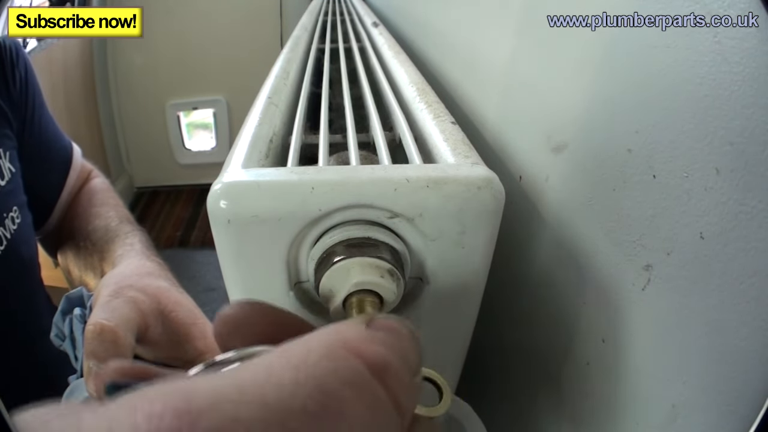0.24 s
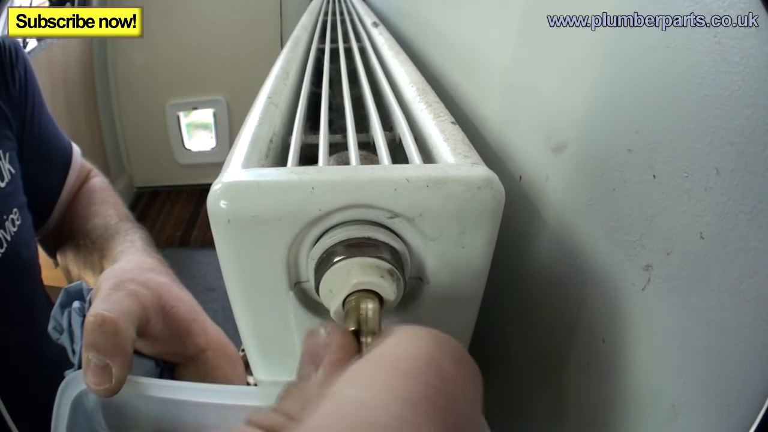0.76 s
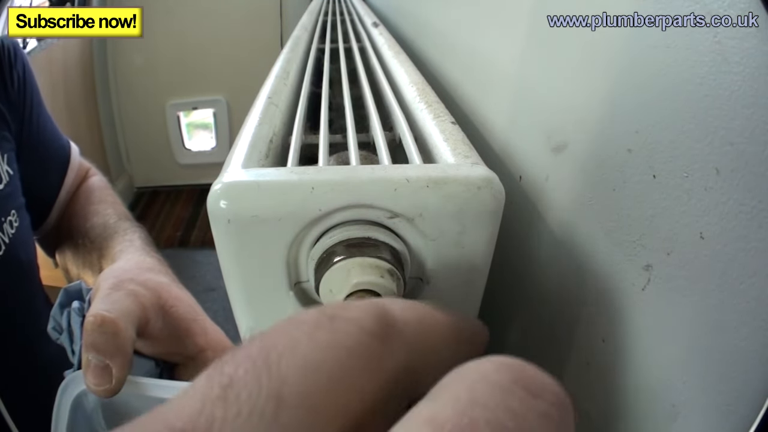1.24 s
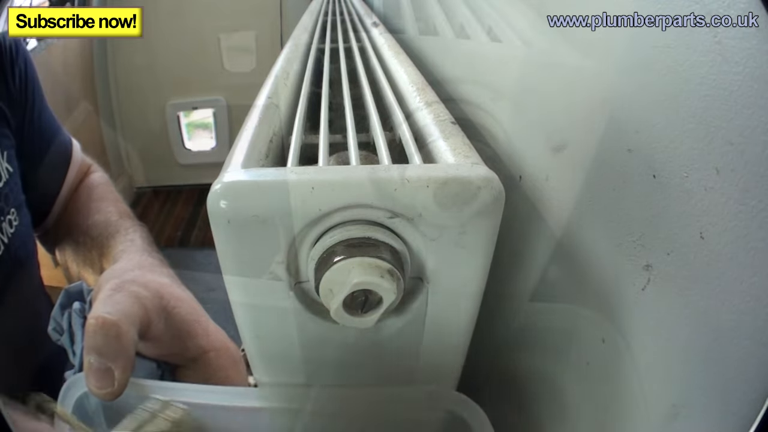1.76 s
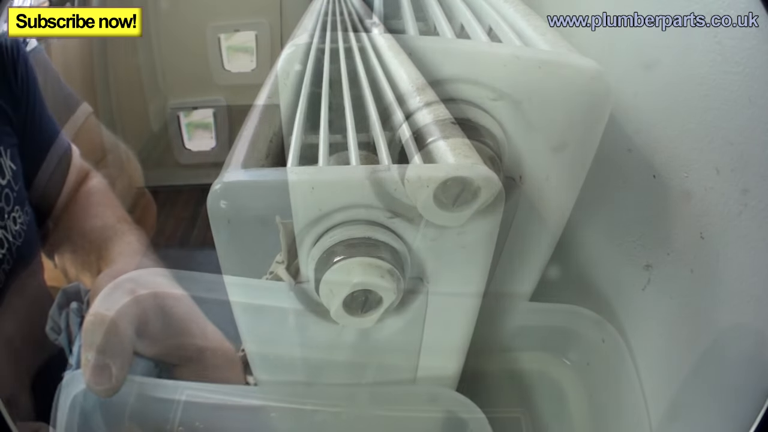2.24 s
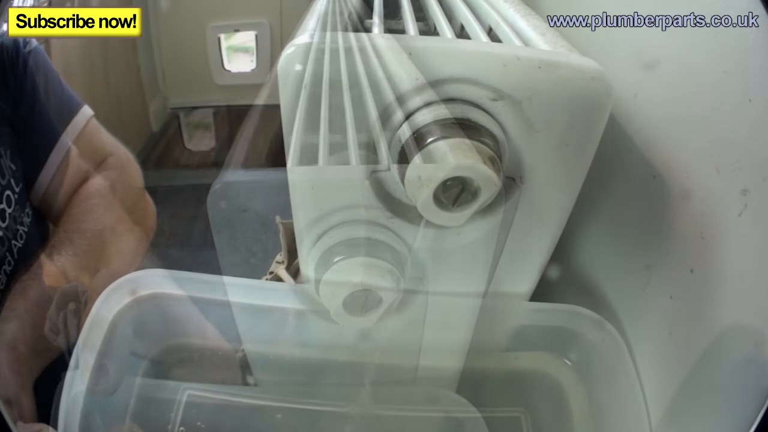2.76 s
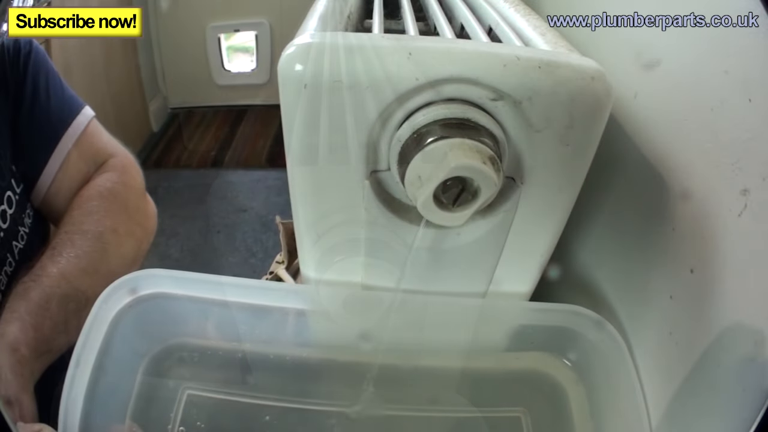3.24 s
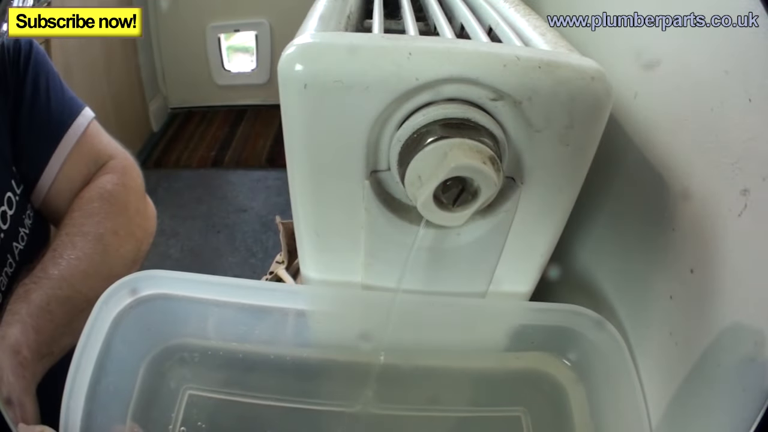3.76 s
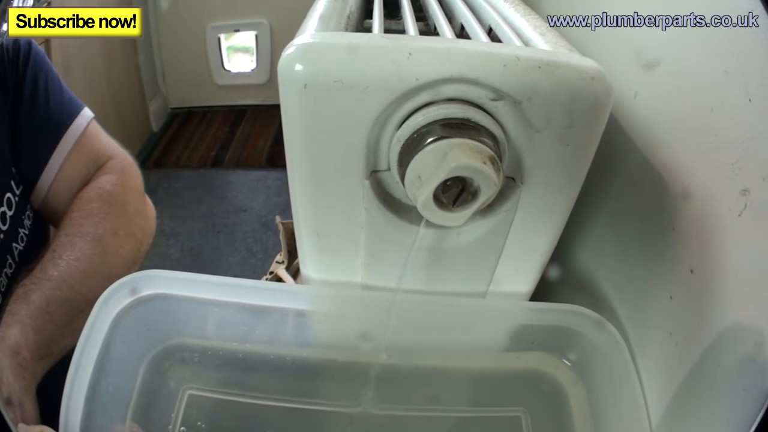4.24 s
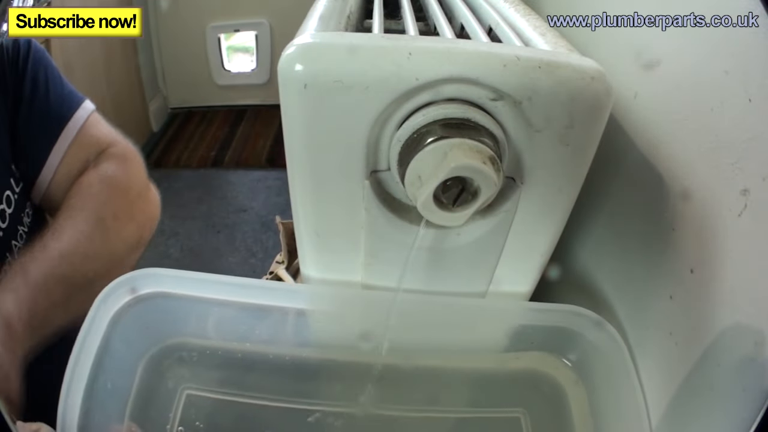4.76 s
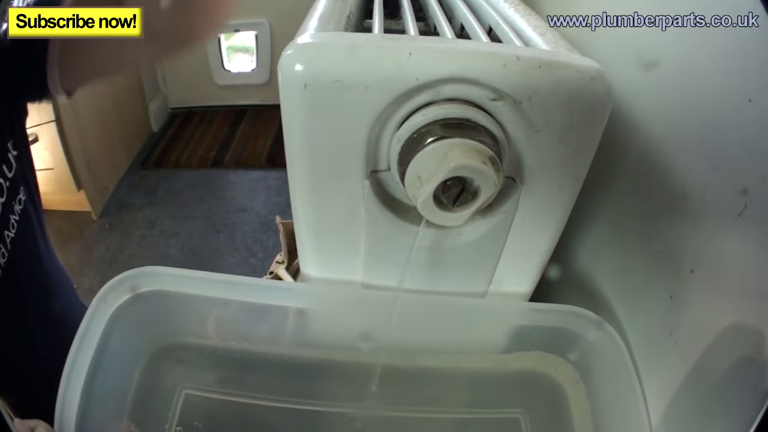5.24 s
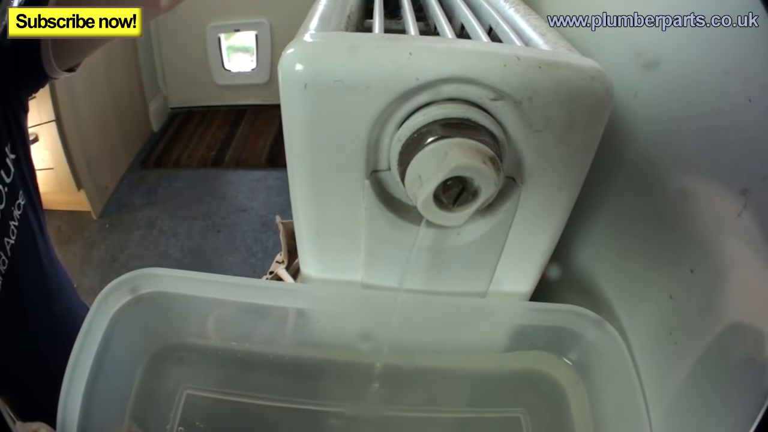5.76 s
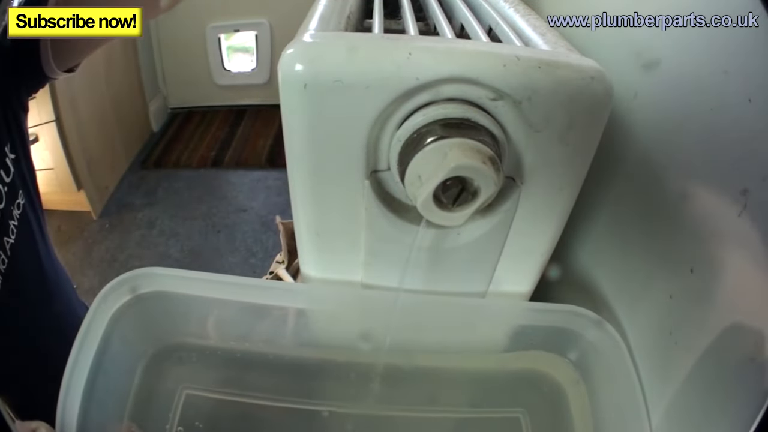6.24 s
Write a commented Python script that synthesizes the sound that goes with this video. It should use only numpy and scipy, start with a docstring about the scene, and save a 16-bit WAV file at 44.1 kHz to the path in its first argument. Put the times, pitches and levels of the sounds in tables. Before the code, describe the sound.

Brass key clicks over a hissing, sputtering jet beating on plastic, then a slow crossfade to a delicate trickle plinking into standing water.

```python
"""Hiss and drumming come first: air and spray rush from an open radiator bleed valve in a small room,
and a thin jet beats on a plastic tub, all close to a microphone with two ports. The brass key clicks on
the valve and a hand brushes past as it is drawn off. The jet scene crossfades into a later one, where a
thin stream runs into standing water and trapped bubbles plink. Noise and resonances make jet and air;
decaying sines make key and bubbles."""
import sys
import numpy as np
from scipy import signal
from scipy.fft import rfft, irfft
from scipy.io import wavfile

SR = 44100
rng = np.random.default_rng(int(sys.argv[2]) if len(sys.argv) > 2 else 0)


def unload_audio(sound):
    """Save the sound as a 16-bit wav file, at the path given as the first command line argument."""
    columns = np.transpose(np.atleast_2d(sound))
    # keep every value between -1 and 1, then stretch to whole-number steps
    steps = np.round(np.clip(columns, -1, 1) * 32767)
    wavfile.write(sys.argv[1], SR, steps.astype(np.int16))


N = 287091
TIME = np.arange(N) / SR

# jet on the tub, uneven while the key is in its way, before the fade: time_s, level_db
JET_LEVEL = [(0, -29.5), (.08, -36.5), (.13, -31.5), (.44, -35.5), (.56, -32), (.66, -30.5), (.72, -40),
             (.78, -30), (.95, -32.5), (1.5, -31.5)]
# main tub resonance, sinking as water loads the plastic: time_s, pitch_hz
TUB_MAIN_PITCH = [(0, 830), (.3, 807), (.62, 772), (1.2, 762), (2, 750)]
# other tub resonances, level relative to the main one: pitch_hz, width_hz, level_db
TUB_RESONANCES = [(216, 26, -18), (281.6, 45.3, -5.5), (367.4, 63, -10.5), (433, 218, -9), (604, 112, -15),
                  (868, 45, -6.5), (1046, 98, -9), (1319, 51, -7), (1398, 281, -8.5), (1642, 520, -19.5),
                  (2158, 390, -21.5)]
# spectrum of the spray through a narrow gap: frequency_hz, density_db_per_hz
NARROW_SPECTRUM = [(200, -32), (1500, -37), (2300, -6.5), (3200, -11.5), (4300, -4), (5300, -1.5),
                   (6500, -3.5), (7700, -8.5), (8800, -12.5), (10500, -8.5), (12000, -25), (14000, -19),
                   (15500, -64)]
# spectrum of the spray with the valve wide open: frequency_hz, density_db_per_hz
OPEN_SPECTRUM = [(200, -44), (1800, 14), (2700, 5), (3400, -5), (4700, 7), (6350, -1.5), (7300, 4.5),
                 (8600, 7.5), (10400, -3), (12500, -4), (13600, -2.5), (15500, -24)]
# level added to the hiss, choked unevenly by the key: time_s, level_db
AIR_LEVEL = [(0, 3.5), (.3, 1.5), (.45, 0), (.56, 4), (.73, 3.5), (.85, 4), (1.2, 2), (1.5, 3), (2.3, 5),
             (2.72, 4), (2.8, 2), (3.4, 2)]
# narrow resonances of the tub wall rung by spray: pitch_hz, level_db
WALL_RESONANCES = [(3130, 8), (3785, 9), (5280, 1), (6840, 2.5), (9700, -8), (10900, -4)]
# key knocks on the valve, with the share rattling on in the radiator: start_s, level_db, share_0_to_1
KEY_KNOCKS = [(0.0336, -27.5, 0.74), (0.098, -32.5, 0.8), (0.1294, -12.5, 0.27), (0.142, -12, 0.4),
              (0.1455, -26, 0.24), (0.173, -24, 0.93), (0.2703, -12.5, 0.54), (0.285, -22, 0.9),
              (0.3182, -24.5, 0.7), (0.6636, -26, 0.2)]
# ringing of key and valve: pitch_hz, level_db, t60_s
KEY_RESONANCES = [(2160, 1, 0.028), (2970, -6, 0.045), (4580, -4, 0.044), (5200, -4, 0.03),
                  (5700, 4, 0.059), (7000, 10, 0.02), (8960, 18.5, 0.0044), (10800, 9, 0.0044)]
# spectrum of the rattling radiator panels: frequency_hz, density_db_per_hz
RATTLE_SPECTRUM = [(300, -1), (800, 6.5), (2000, 2), (3300, 4.5), (5600, 6.5), (7500, 4.5), (10000, -8),
                   (15000, -32)]
# clear bubbles trapped by falling water: start_s, pitch_hz, level_db
CLEAR_BUBBLES = [(1.0545, 5040, -31), (1.2417, 10700, -21), (1.324, 12600, -15.5), (1.413, 6670, -27),
                 (1.4526, 8400, -25), (1.5863, 5360, -34), (1.7873, 4620, -29.5), (1.9066, 11200, -23.5),
                 (2.1281, 4620, -28), (2.1635, 10300, -6), (2.1844, 12200, -17), (2.2, 5160, -23),
                 (2.365, 7000, -23), (2.4227, 10360, -9.5), (2.456, 3370, -29.5), (2.468, 4372, -26),
                 (2.5485, 5300, -28), (2.56, 11800, -16.5), (2.5725, 10600, -18.5), (2.614, 3140, -29.5),
                 (2.632, 2820, -32), (2.68, 3500, -31.5), (2.705, 4060, -28), (2.723, 11500, -15),
                 (2.746, 6760, -24), (2.754, 8500, -10.5), (2.8156, 13700, -15), (2.8522, 7040, -24.5),
                 (2.8733, 3550, -25.5), (2.876, 4820, -25), (2.9608, 3300, -28.5), (2.974, 10960, -18),
                 (2.9844, 9400, -16), (3.0805, 10900, -14.5), (3.1114, 10900, -16.5), (3.1373, 7200, -24),
                 (3.138, 2740, -35.5), (3.171, 5480, -18.5), (3.202, 3330, -27.5), (3.2555, 10800, -15),
                 (3.2856, 5040, -35), (3.3373, 14500, -19.5), (3.339, 3340, -37.5), (3.365, 13500, -28),
                 (3.3882, 3520, -31), (3.4184, 8800, -36.5), (3.4603, 4700, -30.5), (3.5044, 2900, -34.5),
                 (3.547, 3110, -29.5), (3.7325, 4380, -35.5), (3.7935, 3810, -39.5), (3.795, 8060, -34),
                 (3.8275, 8500, -28.5), (3.829, 3780, -35), (3.9102, 4110, -20), (3.9167, 7100, -26.5),
                 (3.9479, 3140, -29.5), (4.0565, 4250, -44.5), (4.1, 5300, -31), (4.106, 3990, -26.5),
                 (4.31, 4580, -30.5), (4.4255, 3830, -25), (4.444, 3570, -33), (4.4751, 7500, -21.5),
                 (4.4755, 3580, -39), (4.4961, 5720, -32), (4.5678, 3470, -34.5), (4.59, 3350, -31),
                 (4.6223, 2960, -40), (4.63, 3100, -29), (4.663, 3230, -39), (4.7276, 7280, -31),
                 (4.7472, 6840, -19.5), (4.757, 6050, -31), (4.781, 3670, -24.5), (4.843, 3110, -42.5),
                 (4.895, 6070, -18.5), (4.895, 3300, -37.5), (4.95, 3500, -44), (4.997, 12230, -31.5),
                 (5.0433, 4200, -31.5), (5.0803, 4820, -31.5), (5.185, 4500, -36.5), (5.186, 3190, -44.5),
                 (5.217, 4560, -36.5), (5.2867, 5550, -18), (5.287, 4150, -32), (5.2877, 8100, -24),
                 (5.4695, 4290, -26), (5.612, 3440, -30), (5.6537, 4300, -46), (5.741, 3850, -25),
                 (5.76, 8150, -21.5), (5.792, 3770, -31), (5.868, 3660, -27.5), (5.9264, 3580, -40),
                 (5.9801, 4800, -28), (6.026, 7630, -27), (6.096, 3800, -24), (6.1506, 3800, -45.5),
                 (6.194, 3426, -34), (6.2178, 3170, -50), (6.356, 8080, -22.5), (6.4138, 5870, -24)]
# tick of a drop on the water in the tub: pitch_hz, level_db, t60_s
DROP_TICK = [(4580, -17, 0.019), (4900, 1, 0.01), (5650, -9, 0.0096), (7120, 5, 0.0089), (7980, 10, 0.0041),
             (8990, 3, 0.0077), (9550, 1.5, 0.0078), (12750, -2, 0.01)]
# echoes from tub walls and radiator: left_delay_s, right_delay_s, gain
EARLY_ECHOES = [(.00062, .00055, 0.14), (.0028, .0029, 0.17), (.0094, 0.011, 0.065)]
# soft bumps against the tub: start_s, level_db, pitch_hz
TUB_BUMPS = [(0.003, -34, 85), (0.032, -40, 101), (0.27, -39, 111), (0.316, -38, 90), (0.381, -37, 131),
             (0.514, -48, 70), (0.601, -50, 129), (0.633, -42, 160), (1.421, -43, 101), (1.456, -39, 115),
             (1.557, -47, 80), (1.808, -45, 160), (1.901, -35, 116)]
# spectrum of bump shudder and brush rumble: frequency_hz, density_db_per_hz
BUMP_SPECTRUM = [(20, -45), (50, -7), (110, 11), (170, 9), (300, 8.5), (900, -33)]
# the hand brushing past, silent outside these times: time_s, level_db
BRUSH_LEVEL = [(.46, -64), (.52, -41), (.57, -41), (.62, -42), (.68, -59), (.73, -77.5)]
# spectrum of the brushing hand: frequency_hz, density_db_per_hz
BRUSH_SPECTRUM = [(500, -1), (1800, 4), (4000, 7.5), (7000, 6), (10000, 0.5), (14000, -8), (16000, -19)]
# spectrum of the room tone: frequency_hz, density_db_per_hz
ROOM_TONE_SPECTRUM = [(25, -13), (45, -2.5), (90, 0.5), (130, 0.5), (205, 1.5), (270, -1), (550, -4),
                      (1100, -9.5), (2000, -14.5), (5000, -21), (10000, -19.5), (13500, -23.5),
                      (15000, -47)]
# reverberation time of the room: frequency_hz, t60_s
ROOM_DECAY = [(200, 0.77), (2000, 0.44), (3500, 0.28), (6000, 0.14), (15000, 0.15)]
# left-right likeness of diffuse sound: frequency_hz, likeness_0_to_1
STEREO_LIKENESS = [(60, 0.92), (150, 0.72), (300, 0), (1400, 0), (2800, 0.67), (6800, 0.68), (15000, 1)]
# bands where reflections between tub and radiator cancel: frequency_hz, width_hz, depth_0_to_1
CANCELLED_BANDS = [(1887, 90, 0.63), (5500, 110, 0.32), (6400, 330, 0.29), (10390, 200, 0.45),
                   (12750, 600, 0.4)]
# lead of the right microphone port, nearer to the jet: frequency_hz, lead_rad
RIGHT_PORT_LEAD = [(120, 0.1), (420, 0.4), (1400, 0.3), (1700, 1), (2000, 1.24), (3400, 0.58), (6000, 0.12)]

# the jet scene fades out between these times
FADE_START_S, FADE_END_S = 1.47, 3.62
# opening (0-1) holds at the narrow share until the key comes off, then nears 1 with a time constant
NARROW_SHARE, KEY_OFF_S, OPENING_S = 0.31, 1.05, 0.92
# the upper tub resonance keeps its pitch but gains strength over the drumming
TUB_UPPER_HZ, UPPER_START_DB, UPPER_DB_PER_S = 1157, -14.5, 2.5
# base ring of a bubble; its cycles halve with each HALVING_DB above TYPICAL_DB
RING_CYCLES, TYPICAL_DB, HALVING_DB = 87, -25.5, 35
# big bubbles form right of centre, fine ones nearer the middle (left minus right)
PAN_DB, PAN_DB_PER_OCTAVE = -2.5, 1.4
# pitch range of the spatter; the lower end is also the reference for bubble size
LOWEST_HZ, HIGHEST_HZ = 3010, 13200
# the jet spatters once the tub is wet
WET_S = 1.3
ROOM_TONE_DB = -57.5
# upper band limit of the recorder
EDGE_HZ = 15600


def drumming(drops_per_s=330, jitter=.45, spread_db=3.0, wash=0.65, main_width_hz=92,
             upper_width_hz=220, lean_db=2, drift=0.0075, drift_hz=3):
    """An uneven string of drops beats on the tub and rings its resonances, which waver as the jet wanders."""
    gap, size = rng.standard_normal((3000, 2)).T
    landing = (np.cumsum(np.exp(jitter * gap)) * SR / drops_per_s).astype(int)
    blows = np.bincount(landing, amp(spread_db * size), N)[:N]
    force = unit(blows - blows.mean()) + wash * rng.standard_normal(N)
    low = resonate(force, along(TUB_MAIN_PITCH), main_width_hz)
    upper_db = UPPER_START_DB + UPPER_DB_PER_S * np.minimum(TIME, FADE_END_S)
    high = amp(upper_db) * resonate(force, TUB_UPPER_HZ, upper_width_hz)
    for k, (hz, width, db) in enumerate(TUB_RESONANCES):
        # each part of the tub answers a little later
        late_force = np.roll(force, k * SR // 1500)
        wavering_hz = hz * (1 + drift * wander(drift_hz))
        group = low if hz < 950 else high
        group += amp(db) * resonate(late_force, wavering_hz, width)
    # the upper modes radiate to the left
    tub = unit(low * panned(-0.62) + high * panned(lean_db))
    return tub * fade(TIME) * amp(along(JET_LEVEL))


def fade(s):
    """Level of the jet scene, 1 to 0, as it crossfades into the trickle."""
    return np.cos(np.pi / 2 * np.clip((s - FADE_START_S) / (FADE_END_S - FADE_START_S), 0, 1))


def hiss(specks_per_s=800, speck_db=4, speck_share=1, flutter_db=2.0, narrow_db=-49, open_db=-40):
    """Air rushes and sputters through the valve; fine spray ticks on the plastic and rings it."""
    speck_size = amp(speck_db * np.minimum(rng.exponential(1, N), 4))
    specks = (rng.random(N) < specks_per_s / SR) * speck_size
    source = rng.standard_normal((2, N)) + speck_share * unit(specks * rng.choice([-1, 1], (2, N)))
    opening = 1 - (1 - NARROW_SHARE) * np.exp(-np.maximum(TIME - KEY_OFF_S, 0) / OPENING_S)
    narrow = past_hand(coloured(source, NARROW_SPECTRUM))
    wide = coloured(source, OPEN_SPECTRUM) + wall_ring()
    spray = (1 - opening) * narrow + opening * wide
    # narrow_db and open_db are the ends of the scale, at opening 0 and 1
    db = narrow_db + (open_db - narrow_db) * opening + along(AIR_LEVEL)
    return spray * fade(TIME) * amp(db + flutter_db * wander(200)) * panned(-0.74)


def wall_ring(width_hz=260, drift=0.0077, drift_hz=4, flutter_db=2, flutter_hz=22):
    """Spray noise rings the tub wall, whose resonances drift and flutter as the jet wanders."""
    wall = np.zeros(N)
    for hz, db in WALL_RESONANCES:
        level = amp(db + flutter_db * wander(flutter_hz))
        wall += level * resonate(rng.standard_normal(N), hz * (1 + drift * wander(drift_hz)), width_hz)
    return wall


def past_hand(x, delay_s=.00058, sway=0.15, sway_hz=2.4, gain=0.37):
    """The moving hand mirrors the hiss, so that bands of colour shift through it."""
    late = TIME - delay_s * (1 + sway * wander(sway_hz))
    return unit(x + gain * np.array([np.interp(late, TIME, channel) for channel in x]))


def key(ring_db=-2, rattle_db=-8, rattle_t60=0.11, contact_s=0.0008, chatter_db=3.0, chatter_hz=350,
        scrape_db=-25, scrape_s=0.0077):
    """The key scrapes up to each knock, which rings the brass and sets the steel panels chattering."""
    t = np.arange(SR // 4) / SR
    body = sum(amp(db) * np.sin(2 * np.pi * hz * t) * decay(t, t60) for hz, db, t60 in KEY_RESONANCES)
    brass, shake = np.zeros((2, N)), np.zeros(N)
    for s, db, share in KEY_KNOCKS:
        contact = rng.standard_normal(len(t)) * np.exp(-t / contact_s)
        ring = signal.fftconvolve(contact, body)[:len(t)]
        click = ring / abs(ring).max() + 0.32 * contact / abs(contact).max()
        add(brass, s, amp(db + ring_db) * click)
        add(shake, s, amp(db + rattle_db) * share * decay(t, rattle_t60))
        # the scrape swells up to the knock
        shake += amp(db + scrape_db) * (TIME < s) * np.exp(-abs(TIME - s) / scrape_s)
    chatter = unit(amp(chatter_db * wander(chatter_hz)))
    return (brass + shake * chatter * noise(RATTLE_SPECTRUM)) * panned(-2.1)


def trickle(low_cut_hz=2700, high_cut_hz=14800):
    """Plinks, droplets, spatter and slaps of the drops, all mirrored by tub walls and radiator."""
    # such small bubbles radiate little bass
    band = signal.butter(4, [low_cut_hz, high_cut_hz], "band", fs=SR, output="sos")
    ringing = signal.sosfilt(band, plinks() + droplets() + spatter())
    return mirrored(ringing + slaps(), EARLY_ECHOES)


def plinks(lead_s=0.0053, landing_db=-25):
    """Each clear bubble follows the faint tap of its drop landing."""
    water = np.zeros((2, N))
    for (s, hz, db), lead in zip(CLEAR_BUBBLES, rng.random(len(CLEAR_BUBBLES))):
        add(water, s, bubble(hz, db))
        add(water, s - lead_s * (.5 + lead), amp(db + landing_db) * plink(hz, cycles=4.4, snap_db=-6))
    return water


def bubble(hz, db, twin_db=-8, twin_spread=0.15, twin_lag_s=0.0014, scatter_db=0.5, size_damping=0.21,
           ring_spread=0.66, most_rise=0.039):
    """A plink, damped by its splash and placed by its size; a twin of half the ring pinches off just after."""
    size, lag, side, life, depth = rng.random(5)
    # a harder splash damps the bubble sooner
    halvings = (max(db, TYPICAL_DB) - TYPICAL_DB) / HALVING_DB
    chance = ring_spread * (2 * life - 1)
    cycles = RING_CYCLES * 2 ** (chance - halvings) * (LOWEST_HZ / hz) ** size_damping
    sound = plink(hz, cycles, rise=most_rise * depth)
    twin = plink(hz * (1 + twin_spread) ** (size + .5), cycles / 2)
    add(sound, twin_lag_s * lag, amp(twin_db) * twin)
    pan = PAN_DB + PAN_DB_PER_OCTAVE * np.log2(hz / LOWEST_HZ) + scatter_db * (2 * side - 1)
    return amp(db) * panned(pan) * scattered(sound)


def plink(hz, cycles, rise=0.01, tick_db=-16, snap_db=-14.0, snap_s=0.0011, birth_cycles=0.46,
          tick_fall_hz=6000, linger=0.65, settle_cycles=6, wobble_db=-12, wobble_spread=0.193,
          radiating_share=0.97, quench=1.2):
    """A drop snaps and ticks; its bubble starts hard and misshapen, settles, and rises as it is quenched."""
    t = np.arange(SR // 25) / SR
    age = t * hz / cycles
    note = np.sin(2 * np.pi * hz * t * (1 + rise * age / 2))
    note = note * (linger + np.exp(-t * hz / settle_cycles))
    # the misshapen bubble wobbles above its note, and radiates little below it
    wobble_hz = hz * (1 + wobble_spread) ** (rng.random() + .5)
    wobble = amp(wobble_db) * np.sin(2 * np.pi * wobble_hz * t)
    high_pass = signal.butter(2, radiating_share * hz, "high", fs=SR)
    ring = signal.lfilter(*high_pass, (note + wobble) * decay(age ** quench, 1))
    impact = amp(snap_db) * rng.standard_normal(len(t)) * np.exp(-t / snap_s)
    chances = rng.standard_normal((len(DROP_TICK), 2))
    for (mode_hz, db, t60), (detune, sign) in zip(DROP_TICK, chances):
        tick = np.sin(2 * np.pi * mode_hz * (1 + 0.02 * detune) * t) * decay(t, t60)
        impact += np.sign(sign) * amp(db + tick_db) * tick
    weight = min(1, (tick_fall_hz / hz) ** 2)  # small bubbles come from light drops
    return (ring + weight * impact) * (1 - np.exp(-t * hz / birth_cycles))


def scattered(sound, level_db=-10, decay_s=0.0044):
    """Each drop lands somewhere else, so the tub scatters it with its own burst of quick reflections."""
    t = np.arange(SR // 50) / SR
    taps = rng.standard_normal((2, len(t))) * np.exp(-t / decay_s)
    taps = taps / np.linalg.norm(taps[0])
    return sound + amp(level_db) * signal.fftconvolve(sound[None], taps, axes=1)[:, :len(sound)]


def droplets(count=110, level_db=-53, range_db=13, top_hz=9000, pan_db=2.0):
    """Droplets of the trickle too small to hold a clear note."""
    water = np.zeros((2, N))
    for when, pitch, size in rng.random((count, 3)):
        s = FADE_END_S + (TIME[-1] - FADE_END_S) * when
        hz = LOWEST_HZ * (top_hz / LOWEST_HZ) ** (pitch ** 2)
        level = amp(level_db + range_db * size ** 3)
        add(water, s, level * panned(pan_db) * plink(hz, cycles=13, snap_db=-8.5))
    return water


def spatter(count=300, level_db=-38, range_db=10, fine_db_per_octave=4.0, follow=0.65, tick_cycles=16,
            build_s=0.68):
    """The jet's droplets tick in the tub: louder as it gets wet, weaker as the jet scene fades out."""
    water = np.zeros((2, N))
    for when, pitch, size, side in rng.random((count, 4)):
        s = WET_S + (FADE_END_S - WET_S) * when
        hz = LOWEST_HZ * (HIGHEST_HZ / LOWEST_HZ) ** (pitch ** 2)
        db = level_db + range_db * size ** 3 + fine_db_per_octave * np.log2(hz / LOWEST_HZ)
        wet = min((s - WET_S) / build_s, 1)
        level = wet * fade(s) ** follow * amp(db)
        add(water, s, level * panned(4 * (2 * side - 1)) * plink(hz, tick_cycles))
    return water


def slaps(level_db=-37, follow=0.32, decay_s=0.0015, low_hz=550, high_hz=3200):
    """Each drop slaps the water: a dull broad tick that grows slowly with the level of its plink."""
    t = np.arange(SR // 50) / SR
    water = np.zeros((2, N))
    for s, _, db in CLEAR_BUBBLES:
        level = amp(level_db + follow * (db - TYPICAL_DB))
        add(water, s, level * rng.standard_normal(len(t)) * np.exp(-t / decay_s))
    band = signal.butter(1, [low_hz, high_hz], "band", fs=SR, output="sos")
    return signal.sosfilt(band, water) * panned(PAN_DB)


def mirrored(x, echoes):
    """A sound with its early echoes."""
    heard = x.copy()
    for left_s, right_s, gain in echoes:
        add(heard[0], left_s, gain * x[0])
        add(heard[1], right_s, gain * x[1])
    return heard


def handling(swell_s=0.0029, shudder_db=-10, shudder_s=0.019, rumble_db=-8, low_cut_hz=48):
    """Each bump is a low push and a short shudder of the tub; a hand brushes past with a rumble."""
    t = np.arange(SR // 8) / SR
    push, shudder = np.zeros(N), np.zeros(N)
    for s, db, hz in TUB_BUMPS:
        swell = t / swell_s * np.exp(1 - t / swell_s)
        add(push, s, amp(db) * np.sin(2 * np.pi * hz * t) * swell)
        add(shudder, s, amp(db + shudder_db) * (1 - np.exp(-t / swell_s)) * np.exp(-t / shudder_s))
    brush = amp(along(BRUSH_LEVEL)) * (TIME > BRUSH_LEVEL[0][0]) * (TIME < BRUSH_LEVEL[-1][0])
    push = signal.sosfilt(signal.butter(2, low_cut_hz, "high", fs=SR, output="sos"), push)
    rumble = (shudder + amp(rumble_db) * brush) * noise(BUMP_SPECTRUM)
    return push + rumble + brush * noise(BRUSH_SPECTRUM)


def hollowed(x):
    """Takes out the narrow bands in which reflections cancel."""
    for hz, width, depth in CANCELLED_BANDS:
        notched = signal.lfilter(*signal.iirnotch(hz, hz / width, SR), x)
        x = x + depth * (notched - x)
    return x


def room(x, delay_s=0.021):
    """The diffuse tail of a small room, decaying noise whose treble dies sooner."""
    hz, t, z = signal.stft(rng.standard_normal((2, SR // 2)), SR, nperseg=256)
    t60 = across(ROOM_DECAY, hz)[:, None]
    tail = signal.istft(z * decay(t, t60), SR, nperseg=256)[1]
    tail = tail * (np.arange(tail.shape[1]) > delay_s * SR)
    return signal.fftconvolve(x, tail / np.linalg.norm(tail[0]), axes=1)[:, :N]


def room_tone():
    """The steady diffuse noise of the room."""
    return amp(ROOM_TONE_DB) * noise(ROOM_TONE_SPECTRUM)


def noise(colour):
    """Diffuse stereo noise of rms 1."""
    return coloured(rng.standard_normal((2, N)), colour)


def coloured(pair, colour):
    """Two unrelated signals become one diffuse stereo sound with the given spectrum."""
    hz = np.fft.rfftfreq(N, 1 / SR)
    a, b = rfft(pair) * amp(across(colour, hz))
    same = np.clip(across(STEREO_LIKENESS, hz), 0, 1)
    mid, side = a * np.sqrt(1 + same), b * np.sqrt(1 - same)
    return unit(irfft([mid + side, mid - side], N))


def wander(hz):
    """Slow chance of rms 1, its spectrum falling off around the given rate."""
    f = np.fft.rfftfreq(N, 1 / SR)
    return unit(irfft(rfft(rng.standard_normal(N)) * np.exp(-(f / hz) ** 2), N))


def resonate(x, hz, width):
    """A two-stage resonance of gain 1 that may follow a pitch curve."""
    # shift the pitch to zero, smooth twice, shift back
    turn = np.exp(2j * np.pi * np.cumsum(hz * np.ones(N)) / SR)
    r = np.exp(-np.pi * width / SR)
    smooth = signal.lfilter([(1 - r) ** 2], [1, -2 * r, r * r], x / turn + 1e-18)
    return 2 * (turn * smooth).real


def decay(t, t60):
    """Exponential decay by 60 dB in t60."""
    return np.exp(-np.log(1000) * t / t60)


def amp(db):
    """Decibels to gain."""
    return 10 ** (np.asarray(db) / 20)


def unit(x):
    """Scales to rms 1."""
    return x / np.sqrt(np.mean(x ** 2) + 1e-20)


def along(rows):
    """A curve at every sample."""
    return np.interp(TIME, *np.transpose(rows))


def across(points, hz):
    """A spectrum read on a log-frequency axis."""
    f, value = np.transpose(points)
    return np.interp(np.log(hz + 1), np.log(f + 1), value)


def add(mix, s, sound):
    """Mixes a sound in at time s."""
    part = mix[..., max(round(s * SR), 0):][..., :sound.shape[-1]]
    part += sound[..., :part.shape[-1]]


def panned(db):
    """Left and right gains for a level difference, left minus right."""
    return amp(np.array([[db], [-db]]) / 2)


def scene():
    """All sources close to the microphone, with a little room."""
    tub, water, clicks = drumming(), trickle(), key()
    sent = amp(-21.5) * tub + amp(-24.0) * water + amp(-18.0) * clicks
    return hollowed(tub + water + hiss()) + clicks + handling() + room(sent) + room_tone()


def record(dry):
    """The two microphone ports, the right one leading in phase, then the band limit of the recorder."""
    lead = across(RIGHT_PORT_LEAD, np.fft.rfftfreq(2 * N, 1 / SR))
    turned = rfft(dry, 2 * N) * np.exp(.5j * np.array([-lead, lead]))
    ports = irfft(turned)[:, :N]
    low_pass = signal.firwin(301, EDGE_HZ, window=("kaiser", 9), fs=SR)
    return signal.oaconvolve(ports, low_pass[None], "same")


dry = scene()
out = record(dry)
unload_audio(out)
```